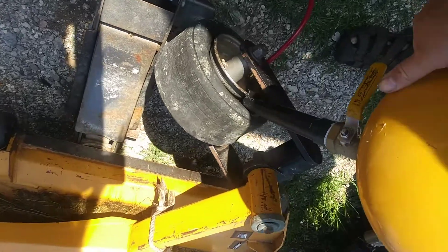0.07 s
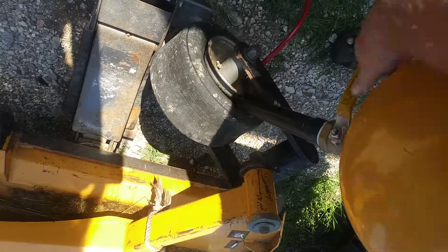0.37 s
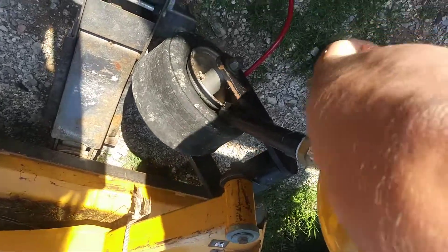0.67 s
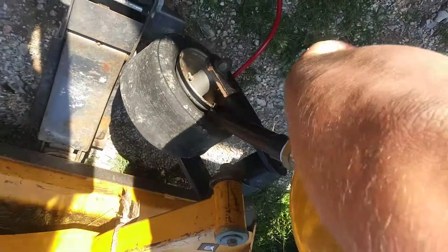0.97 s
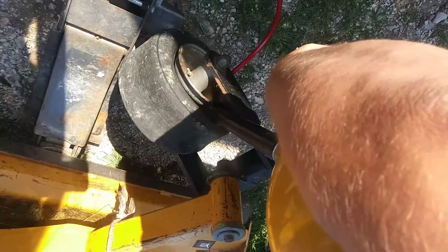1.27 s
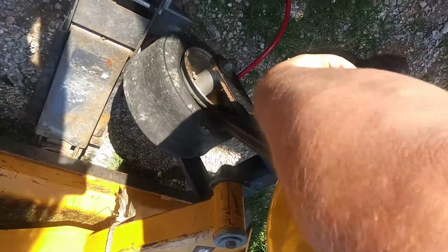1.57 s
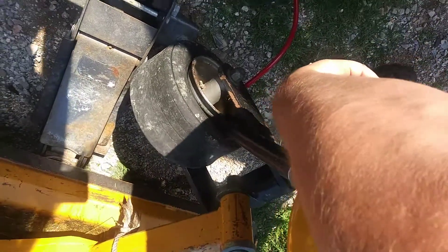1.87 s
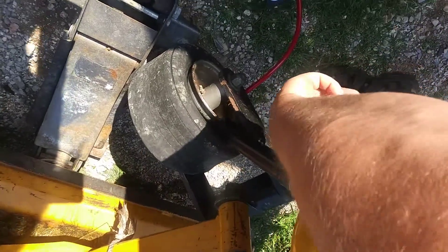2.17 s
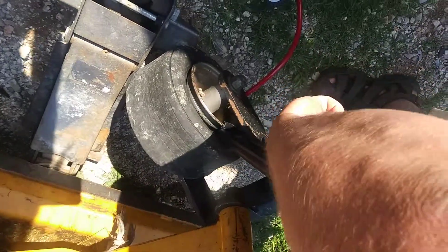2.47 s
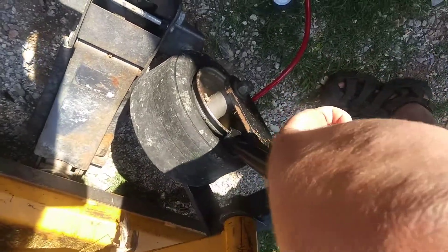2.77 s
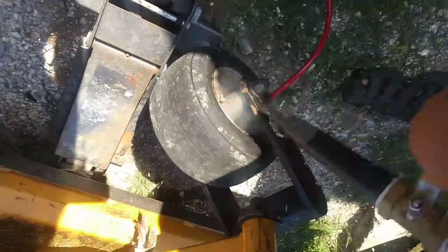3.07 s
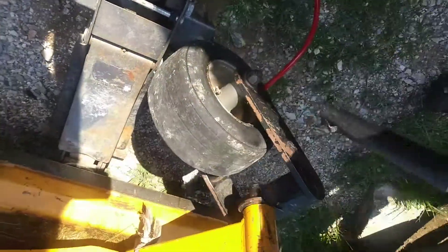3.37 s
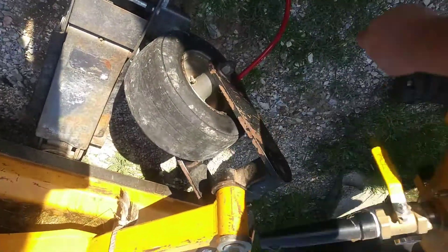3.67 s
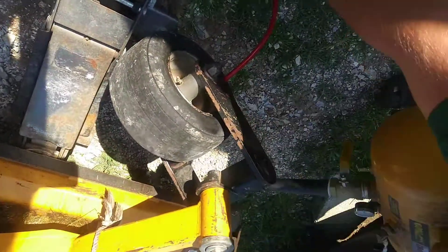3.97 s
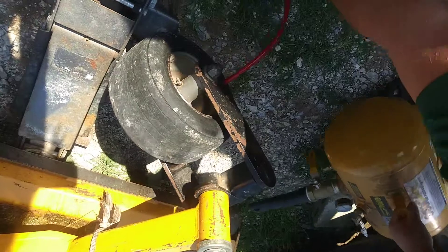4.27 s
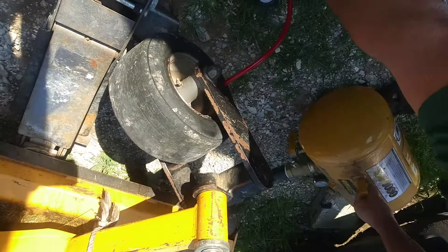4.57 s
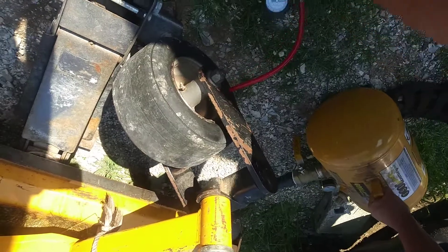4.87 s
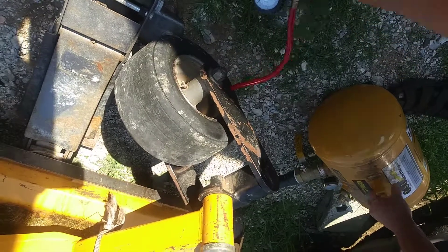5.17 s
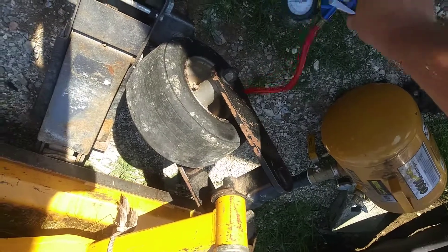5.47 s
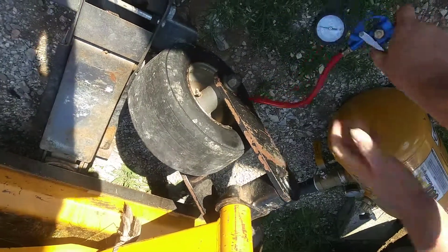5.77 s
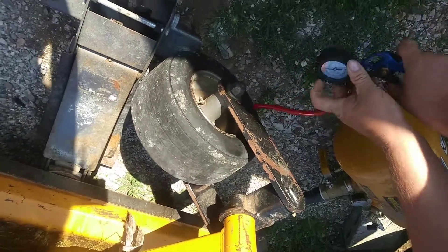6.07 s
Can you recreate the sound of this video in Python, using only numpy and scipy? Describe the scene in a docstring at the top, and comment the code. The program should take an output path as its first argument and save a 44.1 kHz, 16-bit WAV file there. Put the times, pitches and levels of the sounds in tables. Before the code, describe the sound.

A faint outdoor murmur and the thin, high hiss of a leaking air fitting run underneath. For the first 2.8 seconds, a metal air tank is handled close to the microphone, with soft dull bumps, hand rubs and scattered light clicks from the nozzle and valve lever. At about 2.8 seconds a sudden, very loud blast of compressed air roars into a small tire, slightly overloading the microphone. The tire wall flaps with several quick, dull rubber thumps until 3.2 seconds. The roar collapses into a hollow, fizzy rush that fades steadily as the tank drains. The tank is set down with a soft bump at 4.2 seconds and a sharp metal clack near 4.4. At 4.9 seconds an air hose opens and feeds the tire with a bright, steady, slightly fluttering hiss that lasts to the end, around 6 seconds.

```python
"""A bead seater tank blasts air into a small tire outdoors: after a few handling clicks and bumps,
the ball valve opens and a choked jet roars. Falling pressure sinks it to a hollow rush as the tank
drains, is pulled away and is set down. Then an air hose opens and hisses steadily into the tire.
Under it all the yard murmurs and a fitting leaks; the close microphone overloads softly."""
import sys
import numpy as np
from scipy.fft import rfft, irfft, next_fast_len
from scipy.io import wavfile
from scipy.ndimage import map_coordinates

SR = 44100
rng = np.random.default_rng(int(sys.argv[2]) if len(sys.argv) > 2 else 0)


def bounce(signal):
    """Save signal as a 16-bit WAV file at the path given by the first command-line argument."""
    frames = np.transpose(np.atleast_2d(signal))
    limited = np.clip(frames, -1, 1)
    pcm = np.round(limited * 32767).astype(np.int16)
    wavfile.write(sys.argv[1], SR, pcm)


N = 273861

VALVE_OPENS, NOZZLE_LIFTS, HOSE_OPENS = 2.8405, 3.39, 4.907  # s


def amp(db):
    """Decibels to gain."""
    return 10 ** (np.asarray(db) / 20)


def unit(x):
    """x at rms 1."""
    return x / np.sqrt(np.mean(x ** 2) + 1e-20)


def clock():
    """The time of every sample, in seconds."""
    return np.arange(N) / SR


def since(start):
    """Seconds gone by after start, zero before it."""
    return np.maximum(clock() - start, 0)


def ramp(start, length):
    """A straight fade from 0 to 1."""
    return np.clip((clock() - start) / length, 0, 1)


def pulse(t, attack, t60):
    """A quick rise and an exponential decay, from t = 0."""
    t = np.maximum(t, 0)
    return (1 - np.exp(-t / attack)) * amp(-60 * t / t60)


def wobble(rate):
    """A smooth random curve, rate knots a second."""
    return map_coordinates(rng.standard_normal(int(N * rate / SR) + 4), [clock() * rate])


def filtered(x, response):
    """x times a complex response of frequency."""
    size = x.shape[-1]
    padded = next_fast_len(size + 8192)
    return irfft(rfft(x, padded) * response(np.fft.rfftfreq(padded, 1 / SR)), padded)[..., :size]


def low_cut(x, corner_hz):
    """x with its bass rolled off at 12 dB an octave."""
    return filtered(x, lambda f: -f * f / (corner_hz ** 2 - f * f + 1j * np.sqrt(2) * f * corner_hz))


def coloured(points):
    """Noise of rms 1 with a (Hz, dB) spectrum."""
    hz, db = np.transpose(points)
    gain = lambda f: amp(np.interp(np.log(f + 1), np.log(hz), db))
    return unit(filtered(rng.standard_normal(N), gain))


def resonate(x, modes):
    """x through a bank of (Hz, width, dB) resonances of alternating polarity."""
    return filtered(x, lambda f: sum(
        (-1) ** k * amp(db) * 1j * f * width / (hz * hz - f * f + 1j * f * width)
        for k, (hz, width, db) in enumerate(modes)))


def hollow(modes):
    """Noise of rms 1 held in steep-sided (Hz, width, dB) resonances."""
    gain = lambda f: sum(amp(db) / (1 + 2 * ((f - hz) / width) ** 2) ** 2 for hz, width, db in modes)
    return unit(filtered(rng.standard_normal(N), gain))


def swell(centre, half_length, hz, width, db):
    """A band of noise that swells and fades around a centre time."""
    return amp(db) * np.exp(-((clock() - centre) / half_length) ** 2) * hollow([(hz, width, 0)])


def blend(a, b, share):
    """Equal-power mix with the given share of b."""
    return np.sqrt(1 - share) * a + np.sqrt(share) * b


def sway(x, depth, rate):
    """The frequencies of x wander by a small fraction."""
    place = np.cumsum(1 + depth * wobble(rate))
    return unit(map_coordinates(x, [place], order=3, mode="wrap"))


def reflected(x, echo_db):
    """x plus eight copies off the nearby steel and ground; their paths shift as things are moved."""
    copies = np.zeros(N)
    for delay_s in rng.uniform(0.0015, 0.011, 8):
        lag = delay_s * SR * (1 + 0.004 * wobble(2))
        copies += rng.choice([-1, 1]) * map_coordinates(x, [np.arange(N) - lag], order=3)
    return unit(x + amp(echo_db) * unit(copies))


def background():
    """Open-air murmur of the yard and the thin hiss of a leaking air fitting."""
    # Tone of the murmur and of the hiss. Each row: frequency in Hz, level in dB.
    yard_colour = [(30, -65), (100, -26), (145, -3.5), (330, -1), (600, -1.5), (900, -1), (1400, -3),
                   (2700, -1.5), (3400, -7), (5100, -7.5), (5500, -28.5), (7800, -28)]
    leak_colour = [(3400, -47), (5400, -17), (6700, -16), (7000, -10.5), (8400, -7.5), (8900, 1),
                   (9600, -0.5), (10600, -8), (12500, -12), (14200, -10), (15500, -22)]
    # Resonances of the leaking fitting. Each row: frequency in Hz, width in Hz, level in dB.
    leak_modes = [(915, 260, -3), (2110, 130, 0.5), (2650, 250, 0), (3680, 90, 2), (4500, 300, 2.5)]
    # Both duck a little as an arm comes in front of the microphone.
    shade = 1 - np.exp(-since(0.35) / 0.36)
    yard = amp(-52 - 3 * shade + 0.6 * wobble(20)) * coloured(yard_colour)
    hiss = reflected(coloured(leak_colour) + amp(-8.5) * hollow(leak_modes), echo_db=-10)
    leak = amp(-52.5 - 2 * shade + 0.25 * wobble(18)) * hiss
    return yard + leak


def handling():
    """The tank bumps dully and hums on once set down; the hand rubs and creaks on the valve lever."""
    # Tank bumps. Each row: start in seconds, level in dB, pitch in Hz, ring time (t60) in seconds.
    bumps = [(0.062, -46, 170, .12), (0.697, -44, 174, 0.11), (0.96, -57, 105, .12), (1.925, -52, 100, .12),
             (2.08, -49.5, 150, 0.13), (2.119, -45, 200, 0.11), (3.663, -44, 79.5, 0.12),
             (4.176, -37, 155, 0.14), (4.438, -63.5, 119, 3.5)]
    # Hand rubs. Each row: centre and half length in seconds, frequency and width in Hz, level in dB.
    rubs = [(0.22, 0.069, 450, 90, -59), (0.386, 0.064, 420, 100, -62), (0.473, .018, 1084, 140, -54),
            (0.362, 0.17, 3600, 2800, -56.5), (0.475, 0.035, 3600, 2800, -53.5),
            (1.244, .06, 2200, 1000, -54)]
    out, t = np.zeros(N + SR), np.arange(SR) / SR
    for start, db, hz, t60 in bumps:
        ring = np.sin(2 * np.pi * hz * t) * pulse(t, attack=0.014, t60=t60)
        rattle = unit(resonate(rng.standard_normal(len(t)), [(hz, 90, 0)]))
        rattle *= pulse(t, attack=0.014, t60=0.11)
        out[round(start * SR):][:len(t)] += amp(db) * (ring + 0.37 * rattle)
    grain = amp(1.5 * wobble(83))
    return out[:N] + grain * sum(swell(*rub) for rub in rubs)


def contacts():
    """Nozzle and valve handle click: each a dry tap, a short scrape and a faint scatter from nearby."""
    # Each row: start in seconds, peak in dB, knock and tick weights in dB, scrape from 0 to 1.
    clicks = [(0.1, -36, -10, 4, 0.4), (0.132, -34.5, -5, -8, 0.4), (0.878, -28.5, 2, -2, 0.13),
              (1.182, -28.5, -3, -6, 0.18), (1.221, -37.5, -5, -5, .95), (1.246, -30.5, -5, -13, 0.35),
              (1.458, -31, -7, -1, 0.05), (1.76, -37.5, -13, -7, 0.9), (2.3363, -23.5, -11, -17, 0.05),
              (2.53, -38, 0, -10, 0.6), (2.549, -36, 0, -13, 0.3), (2.595, -33.5, -3, -7, .2),
              (2.682, -39, -2, 0, 0.4), (2.757, -31.5, -1, -4, 0), (4.358, -11, -5.5, -1.5, 0.3)]
    # The nozzle's ring, from knock to tick. Each row: frequency in Hz, width in Hz, level in dB.
    nozzle_modes = [(910, 290, 5), (1700, 470, 0.5), (2234, 300, 7), (3650, 2200, -0.5)]
    out, t = np.zeros(N + SR), np.arange(SR // 4) / SR
    for start, db, knock_db, tick_db, scrape in clicks:
        grit = 0.23 * scrape * pulse(t, attack=0.00025, t60=0.035)
        scatter = 0.019 * pulse(t, attack=0.002, t60=0.13)
        force = (t == 0) + (grit + scatter) * rng.standard_normal(len(t))
        # The place of contact decides how strongly each mode answers.
        weights = [knock_db, knock_db / 2, 0, tick_db]
        detunes = 1 + 0.025 * rng.standard_normal(len(nozzle_modes))
        modes = [(hz * detune, width, level + weight)
                 for (hz, width, level), weight, detune in zip(nozzle_modes, weights, detunes)]
        click = low_cut(resonate(force, modes), corner_hz=500)
        click = filtered(click, lambda hz: 1 / (1 + 1j * hz / 5000) ** 3)  # soften the top
        out[round(start * SR):][:len(t)] += amp(db) * click / np.abs(click).max()
    return out[:N]


def hose():
    """Line air sizzles and flutters through the narrow chuck, over a body that slowly grows."""
    # Tone of the sizzle and of the body. Each row: frequency in Hz, level in dB.
    sizzle_colour = [(3400, -56), (5800, -17.5), (7400, -7.5), (8900, -5), (11000, -3), (13000, 4.5),
                     (14300, 5), (15500, 2.5)]
    body_colour = [(12, -37), (20, -24), (304, -21), (405, -15.5), (579, -15.5), (684, -8.5), (911, -5),
                   (1180, -9), (1400, -3.5), (1910, -4), (2420, -2), (3300, -4.5), (3720, -1.5),
                   (4190, -0.5), (6000, -15), (7800, -42), (13200, -120)]
    # Resonances of hose, chuck and valve stem. Each row: frequency in Hz, width in Hz, level in dB.
    chuck_modes = [(7390, 300, -10.5), (9730, 610, -4.5), (10750, 380, -4), (11500, 200, -5.5),
                   (12600, 230, 1.5), (13600, 350, -4), (14140, 200, 0), (14700, 200, 3), (15230, 410, 5.5)]
    stem_modes = [(980, 270, -2.5), (1386, 140, 4.5), (2530, 700, 6), (3740, 93, 8.5), (5020, 220, -0.5)]
    sizzle_db, body_db, rise_db_per_s, attack_s = -11, -24.5, 1.5, 0.013
    t = since(HOSE_OPENS)
    sizzle = blend(coloured(sizzle_colour), sway(hollow(chuck_modes), depth=0.003, rate=4.4), share=0.34)
    body = blend(coloured(body_colour), hollow(stem_modes), share=0.29)
    sizzle = reflected(sizzle, echo_db=-13)
    flutter = amp(0.47 * wobble(6.9) + 0.33 * wobble(220))
    air = amp(sizzle_db) * sizzle + amp(body_db + rise_db_per_s * t + 0.57 * wobble(60)) * body
    return (1 - np.exp(-t / attack_s)) * flutter * air


def fall(hold_s, db_per_s, knee_s):
    """Decibels lost as the tank drains: a hold, a rounded knee, then a steady fall."""
    return db_per_s * knee_s * np.logaddexp(0, (clock() - VALVE_OPENS - hold_s) / knee_s)


def draining():
    """Falling pressure drives turbulence in the pipe; resonances change as the nozzle leaves the rim."""
    # Tone of the rush and of the fizz above it. Each row: frequency in Hz, level in dB.
    rush_colour = [(40, -67), (100, -29), (230, -33.5), (400, -15.5), (600, -14), (730, -5.5), (1050, -1.5),
                   (1550, -2.5), (1900, -1.5), (3060, -2.5), (3470, -5.5), (4700, -9.5), (5700, -16.5),
                   (8450, -33)]
    fizz_colour = [(3240, -38), (5500, -16), (7200, -9), (8200, -12), (9500, -6.5), (10800, -5),
                   (11800, -7), (13200, 1), (14500, 3), (15500, -0.5)]
    # Resonances with the nozzle on the rim, then clear. Each row: frequency and width in Hz, level in dB.
    rim_modes = [(1030, 120, -15), (1240, 130, -8), (1597, 190, -1), (2070, 140, 0), (2272, 89, 3.5),
                 (2486, 110, 2.5), (2690, 100, 1), (3010, 150, -1.5), (3200, 96, 2.5), (4330, 310, -7.5),
                 (4880, 330, -11)]
    clear_modes = [(480, 150, -12), (1070, 240, -7), (1402, 65, 0), (1536, 103, 3), (1683, 110, 3),
                   (2048, 150, 3), (2247, 33, 0), (2614, 210, 3.5), (3020, 170, 1), (3660, 170, -6),
                   (4260, 200, -11)]
    rush_db = -11.5 - fall(hold_s=0.78, db_per_s=16, knee_s=0.22)
    fizz_db = -16.5 - fall(hold_s=0.66, db_per_s=11, knee_s=0.055)
    cavity = blend(hollow(rim_modes), hollow(clear_modes), share=ramp(3.57, 0.32))
    turbulence = reflected(coloured(rush_colour), echo_db=-9)
    rush = blend(turbulence, sway(cavity, depth=0.005, rate=7), share=0.54)
    rush *= amp(rush_db + 0.28 * wobble(45))
    # A slower jet sheds larger eddies, so its low murmur fades less than the rush.
    eddies = amp(0.15 * rush_db - 45) * hollow([(412, 266, 0)])
    body = low_cut(rush + eddies, corner_hz=117)
    fizz = reflected(coloured(fizz_colour), echo_db=-19) * amp(fizz_db + 0.5 * wobble(40))
    unchoked = ramp(2.9, 0.21)
    emptying = amp(-15 * since(HOSE_OPENS))
    return unchoked * (body + fizz) * emptying


def tire_flaps():
    """The tire wall flaps in the jet, each slap a dull rubber thump."""
    # Each row: start in seconds, peak in dB.
    flaps = [(2.858, -11), (2.998, -11), (3.018, -8), (3.031, -13), (3.127, -9.5), (3.19, -15)]
    # Resonances of the wall. Each row: frequency in Hz, width in Hz, level in dB.
    rubber_modes = [(280, 110, -4), (450, 170, -3), (660, 170, 1), (1200, 280, -2)]
    out, t = np.zeros(N), np.arange(SR // 8) / SR
    for start, db in flaps:
        slap = (t == 0) + 0.14 * rng.standard_normal(len(t)) * pulse(t, attack=0.00048, t60=0.021)
        thump = resonate(slap, rubber_modes)
        out[round(start * SR):][:len(t)] += amp(db) * thump / np.abs(thump).max()
    return out


def blast():
    """The choked jet roars at once, holds briefly, collapses and stops as the nozzle leaves the rim."""
    # Tone of the roar. Each row: frequency in Hz, level in dB.
    jet_colour = [(20, -4.5), (40, -8), (160, -16), (300, -1.5), (700, 2), (1300, 3), (2400, 5.5),
                  (3600, 6.5), (4500, 4.5), (5700, -3.5), (8200, -2.5), (10500, 3), (12500, 3), (15000, 2)]
    # A squeal across the rim: centre and half length in seconds, frequency and width in Hz, level in dB.
    squeal = (3.042, .013, 10170, 380, -17)
    jet_db, attack_s, hold_s, halving_s, lift_s = -7, 0.0082, 0.19, 0.063, 0.36
    flow = ramp(VALVE_OPENS, attack_s) * (1 - ramp(NOZZLE_LIFTS, lift_s))
    flow /= 1 + since(VALVE_OPENS + hold_s) / halving_s
    # Full pressure adds a bright spit that is gone within a fifth of a second.
    spit = amp(-6) * hollow([(14800, 2200, 0)]) * (1 - ramp(2.9, 0.13))
    jet = flow * amp(jet_db + 0.3 * wobble(65)) * (coloured(jet_colour) + spit)
    return jet + tire_flaps() + swell(*squeal)


def scene():
    """Everything is close and reaches both channels alike."""
    mix = blast() + draining() + hose() + contacts() + handling() + background()
    return np.array([mix, mix])


def record(dry):
    """The microphone rounds off the tallest peaks; nothing is kept above the band limit."""
    ceiling, top_hz = 0.89, 15520
    rounded = dry / (1 + np.abs(dry / ceiling) ** 5) ** (1 / 5)
    return filtered(rounded, lambda hz: np.clip((top_hz - hz) / 100 + 0.5, 0, 1))


dry = scene()
out = record(dry)
bounce(out)
```